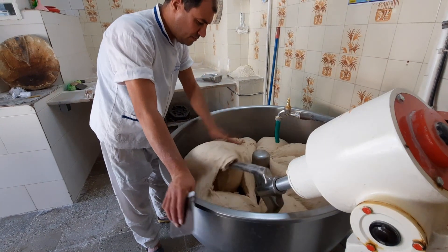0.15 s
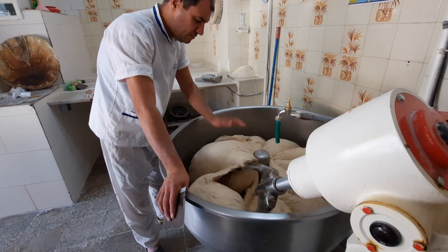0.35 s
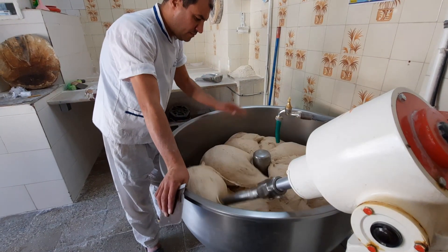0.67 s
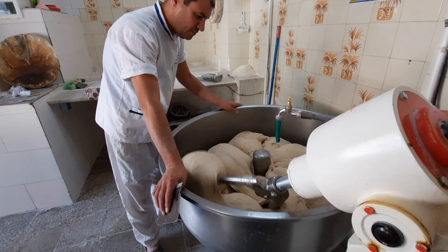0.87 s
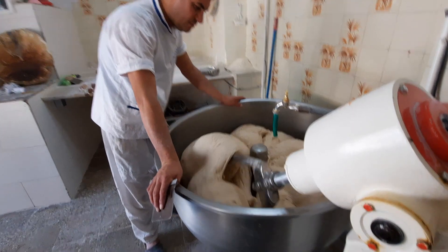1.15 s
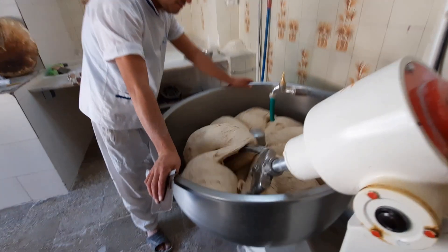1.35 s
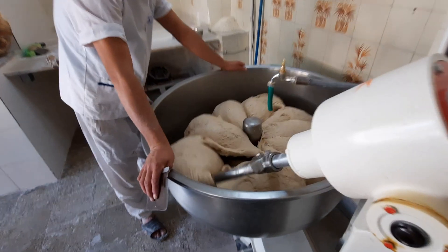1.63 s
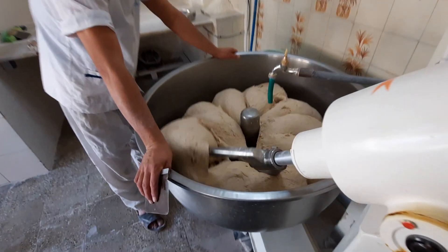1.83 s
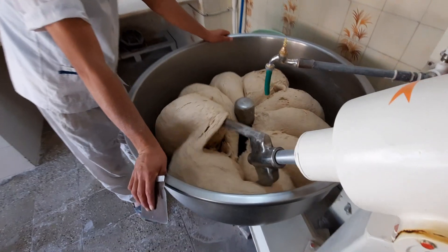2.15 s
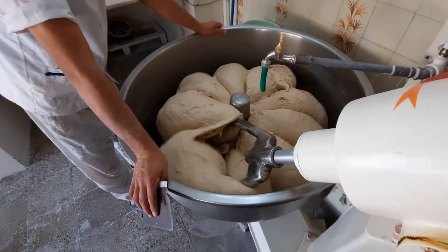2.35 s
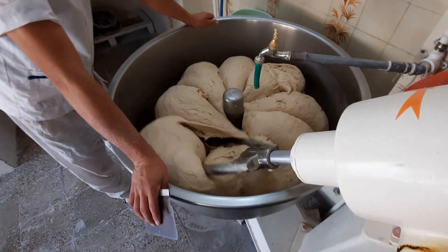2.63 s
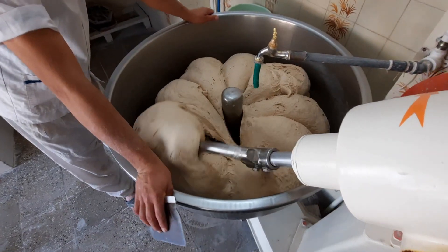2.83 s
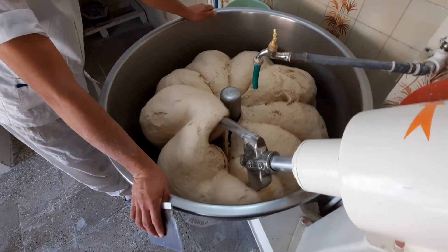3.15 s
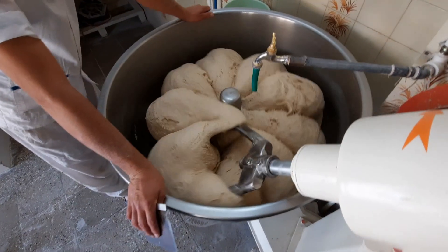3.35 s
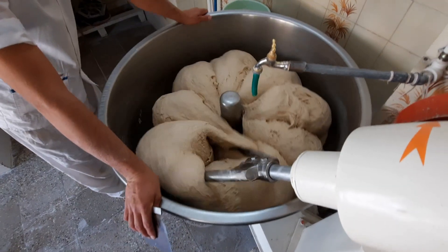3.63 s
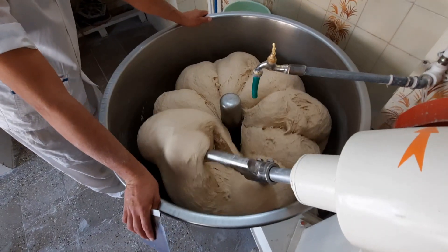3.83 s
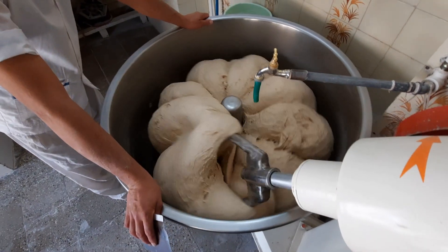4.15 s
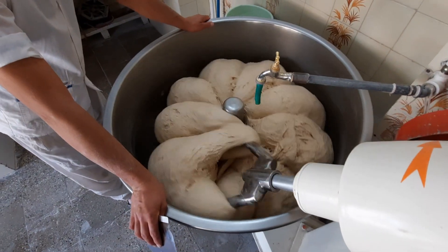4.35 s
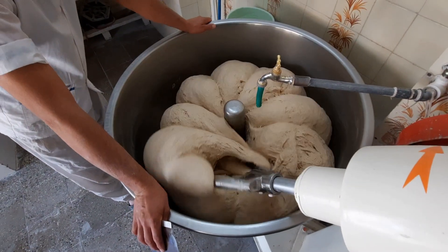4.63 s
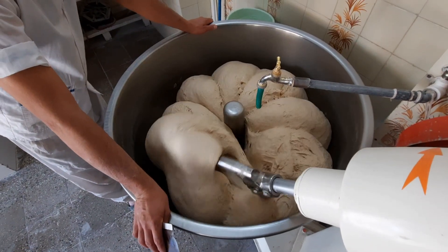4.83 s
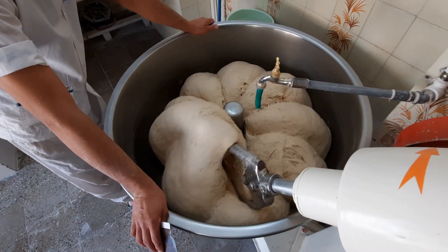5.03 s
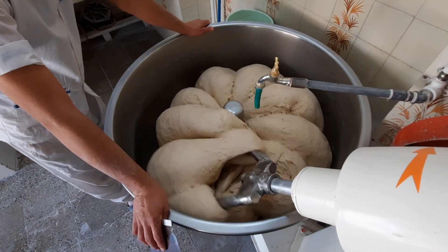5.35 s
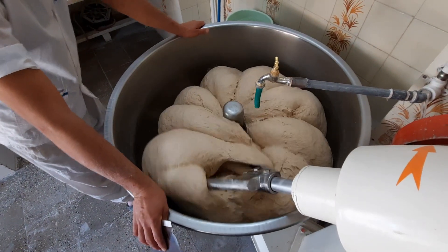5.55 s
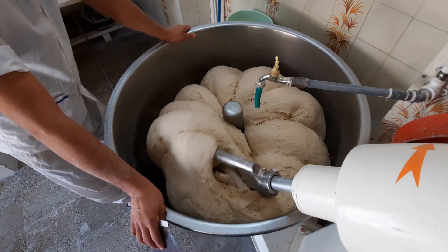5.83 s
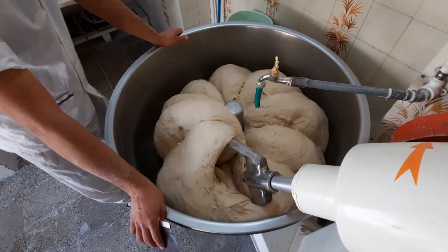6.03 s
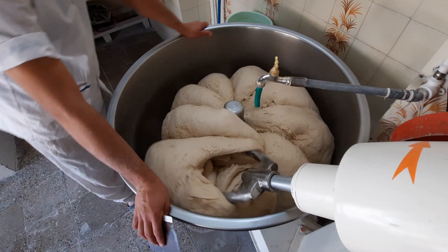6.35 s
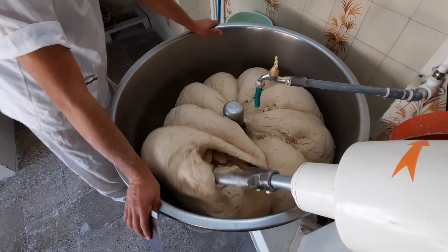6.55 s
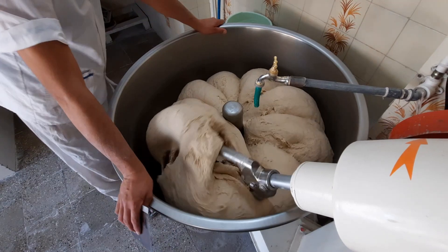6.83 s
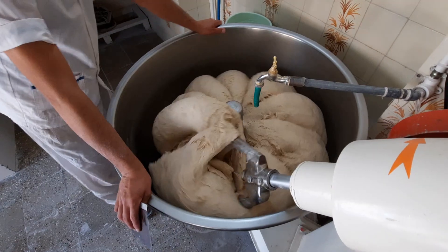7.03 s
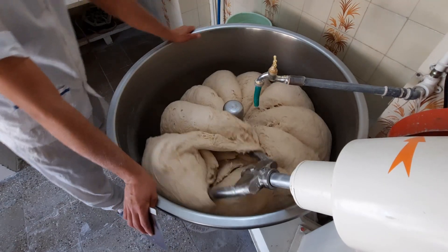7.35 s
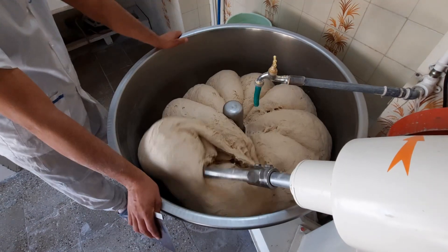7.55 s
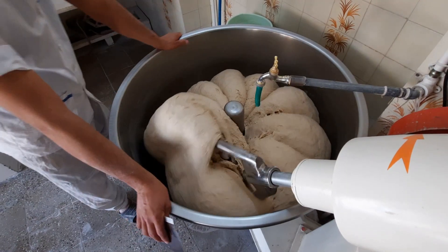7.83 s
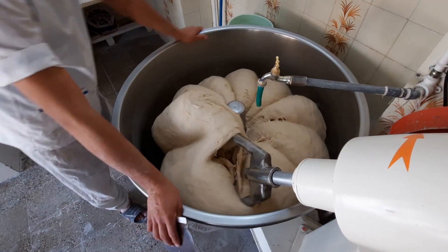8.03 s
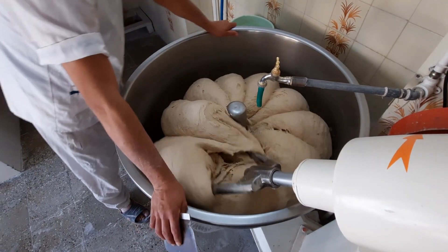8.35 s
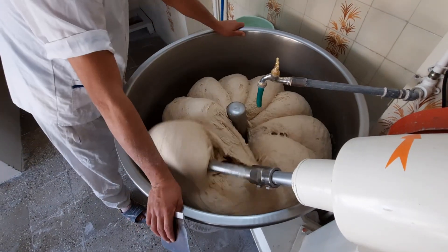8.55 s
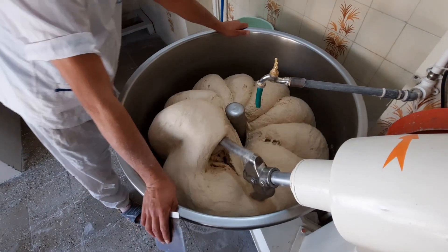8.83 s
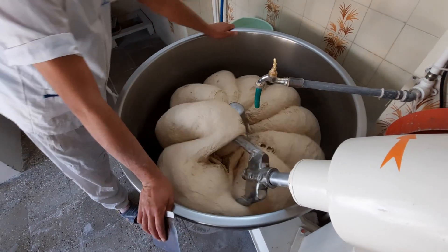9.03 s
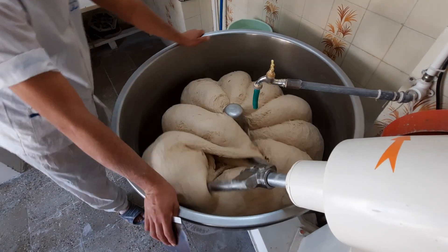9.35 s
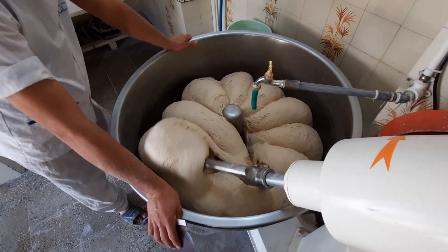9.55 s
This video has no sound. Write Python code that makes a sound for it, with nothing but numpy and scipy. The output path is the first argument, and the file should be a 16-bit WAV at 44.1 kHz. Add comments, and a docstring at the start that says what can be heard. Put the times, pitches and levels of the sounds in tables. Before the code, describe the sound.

A large dough mixer hums and whines steadily in a tiled bakery, with broad machine roar, dull handling bumps and a brief squeak.

```python
"""A motor hum and a whine sound throughout within a broad roar, with dull bumps and gusts on two microphones:
a large dough mixer kneads in a small tiled bakery. Hum, whine and gear notes are sines of wavering level and
phase; the squeal, squeak and bowl drone are noise-driven resonances, the squeal partly a wandering sine.
Roar, rumble, gusts, scuffs and the hiss of tearing dough are filtered noise; bumps are decaying oscillations."""
import sys
import numpy as np
from scipy import signal
from scipy.fft import rfft, irfft, next_fast_len
from scipy.io import wavfile

SR = 44100
rng = np.random.default_rng(int(sys.argv[2]) if len(sys.argv) > 2 else 0)


def output_pcm(signal):
    """Save a mono or channel-first signal as 16-bit PCM at the path in sys.argv[1].

    Samples are clipped to [-1, 1] before scaling.
    """
    pcm = np.clip(np.atleast_2d(signal).T, -1, 1) * 32767
    wavfile.write(sys.argv[1], SR, np.round(pcm).astype(np.int16))


N = 426888   # length in samples

# Machine roar in the room. Each row: time in seconds, level in dB, brightness in dB above about 1 kHz.
ROAR_LEVEL = [(0, -33.5, 1.5), (.7, -34.5, 0.5), (1.5, -36, 1.5), (2.3, -34.5, 0), (3.2, -34, 0.5),
              (4, -34.5, 2), (4.8, -33.5, 0.5), (5.6, -35, 1.5), (6.4, -35, 1.5), (7.2, -35.5, 1.5),
              (8, -36.5, 1), (8.8, -35.5, 1), (9.68, -35.5, 1.5)]
# Spectrum of the roar. Each row: frequency in Hz, density in dB per Hz.
ROAR_COLOUR = [(30, -19), (60, 7), (130, 2.5), (220, -6), (320, 2), (450, -1), (800, 0), (1000, -8),
               (1110, -4.5), (1350, -7.5), (1600, -11), (2600, -14.5), (3500, -23), (6500, -32),
               (8200, -66)]
# Power shared by the two sides. Each row: frequency in Hz, share from 0 to 1.
SHARED_POWER = [(60, 1), (300, 0.9), (700, 0.49), (1500, 0.37), (3000, 0.044), (7000, 0.072)]
# Phase lead of the left side over the right. Each row: frequency in Hz, lead in radians.
LEFT_LEAD = [(30, 0), (600, -.3), (950, -.8), (1550, -3.3), (1890, -2.3), (2670, -5.8), (7000, -8.2),
             (16000, -16)]

# Deep rumble through the floor. Each row: time in seconds, level in dB.
RUMBLE_LEVEL = [(0, -33), (.7, -40.5), (1.7, -35), (2.0, -48), (3.0, -45), (5.0, -48.5), (5.38, -65),
                (5.65, -35.5), (6.45, -48), (6.7, -41), (7.45, -31.5), (8.1, -47), (8.9, -36),
                (9.68, -35.5)]
# Spectrum of the rumble. Each row: frequency in Hz, density in dB per Hz.
RUMBLE_COLOUR = [(15, -31), (30, -35), (60, -7.5), (85, -12), (130, -12), (300, -66)]

# Gusts of air on the microphones. Each row: strongest moment in seconds, level in dB, length in seconds.
GUSTS = [(.08, -36, 0.82), (.88, -33, 0.29), (1.18, -38, 0.11), (1.78, -36, 0.25), (2.33, -37.5, 0.32),
         (2.66, -37.5, 0.28), (3.02, -35, 0.27), (5.64, -37.5, 0.18), (5.85, -39.5, 0.14),
         (6.58, -30, 0.071), (6.75, -37.5, 0.18), (7.1, -40, 0.35), (7.43, -34.5, 0.31),
         (7.6, -34.5, 0.048), (9.42, -32.5, 0.18), (9.6, -39, 0.14)]
# Spectrum of the gusts. Each row: frequency in Hz, density in dB per Hz.
GUST_COLOUR = [(20, -15), (50, -1.5), (140, 7.5), (220, 0.5), (330, 1.5), (500, -6), (900, -26),
               (3000, -77)]
CALM_DB = -50.5   # between the gusts
DRONE_GUST_DB, RUMBLE_GUST_DB = -19, -30   # share of each gust added to drone and rumble

# Dull bumps. Each row: start in seconds, level in dB, pitch in Hz, left-right difference in dB.
BUMPS = [(.015, -14.5, 121, 0), (0.039, -15.5, 130, 0), (.091, -18, 100, -3), (.098, -15.5, 316, 2),
         (.152, -23, 290, -4), (.162, -24, 210, -4), (.184, -17, 114, 7), (0.199, -19.5, 230, -2),
         (.208, -25, 370, 10), (0.743, -19.5, 100, -5), (.799, -20.5, 168, -4), (.873, -16, 155, -2),
         (0.889, -14, 114, 1), (.993, -12, 144, -4), (1.019, -22, 344, -6), (1.029, -20.5, 364, 11),
         (1.099, -18.5, 108, 7), (1.669, -19.5, 308, 0), (1.776, -22, 100, 0), (2.439, -25, 129, 4),
         (2.54, -20.5, 312, -4), (2.629, -21, 308, -6), (2.66, -22, 170, 2), (2.694, -16.5, 310, -4),
         (2.972, -20.5, 172, 7), (3.019, -18, 105, 7), (3.086, -21, 106, -2), (5.619, -20, 147, 6),
         (6.562, -21, 130, -2), (6.574, -14, 324, -4), (6.703, -16.5, 102, -1), (6.813, -21, 101, 6),
         (7.248, -15.5, 106, -4), (7.308, -14.5, 115.7, 6), (7.334, -23, 292, 0), (7.431, -12.5, 119, -1),
         (7.466, -17, 121, -1), (9.373, -14.5, 302, -1), (9.401, -17, 130.5, 2), (9.464, -18, 120, -1),
         (9.525, -15.5, 117, -4)]
BUMP_CYCLES, CYCLES_PER_OCTAVE = 1.63, 1.75   # at 120 Hz; higher bumps ring more cycles

# The steel bowl drones. Each row: time in seconds, level in dB.
DRONE_LEVEL = [(0, -34), (.6, -41.5), (2.1, -44.5), (2.55, -39.5), (4.2, -38), (4.95, -47), (6.3, -43),
               (7.0, -41), (9.68, -66)]
# Resonance of the bowl. Each row: frequency in Hz, width in Hz, level in dB.
BOWL_MODES = [(326.6, 19.5, 0)]

# Scuffs of dough or scraper on the bowl. Each row: start in seconds, level in dB, centre in Hz, length in seconds.
SCUFFS = [(0.203, -40, 3300, 0.026), (0.209, -45, 6000, 0.018), (0.55, -43, 4200, 0.02),
          (2.663, -47, 4300, 0.074), (2.766, -47, 5960, 0.081), (2.874, -45, 2670, 0.26),
          (3.954, -47, 3500, .12), (4.862, -50, 4300, 0.05), (5.82, -49, 4030, 0.13),
          (7.138, -42.5, 2280, 0.09), (7.14, -35, 760, 0.082), (7.146, -40, 1600, .1),
          (9.288, -46, 4000, .06)]

# Dough tearing off the arm. Each row: loudest moment in seconds, hiss level in dB, length in seconds.
TEARS = [(.212, -54, .03), (.47, -59, 0.074), (.9, -58, 0.17), (1.55, -63, 0.78), (2.35, -57, 0.54),
         (2.75, -55.5, 0.57), (3.5, -58, 0.95), (4.3, -55, 0.65), (5.25, -55.5, 1), (6.0, -56.5, 0.47),
         (6.4, -56.5, 0.21), (7.15, -56.5, 0.61), (8.0, -64, 0.98), (9.1, -54.5, 0.85)]
# Spectrum of the hiss. Each row: frequency in Hz, density in dB per Hz.
HISS_COLOUR = [(1500, -14), (3000, 10), (6000, 12), (8000, 14), (9200, -3), (11000, 9.5), (15000, 9.5),
               (15700, 6)]
SLIDING_DB = -64   # between the tears

# A rising chirp. Each row: start in seconds, level in dB, first pitch in Hz, last pitch in Hz, length in seconds.
CHIRPS = [(7.168, -46.5, 2280, 2460, 0.07)]
CHIRP_LEAD = -.08   # cycles, left ahead

# A squeak in quick catches. Each row: time in seconds, level in dB, upper resonance in dB against the lower.
SQUEAK_CATCHES = [(2.887, -46, 0), (2.91, -53, -4), (2.935, -39, -5), (2.977, -42, -12), (3.003, -39, -14),
                  (3.04, -48, -5), (3.07, -51, -2), (3.12, -54, -4), (3.16, -51, -7), (3.2, -54, -6)]
# Resonances of the squeak. Each row: frequency in Hz, width in Hz, level in dB.
SQUEAK_MODES = [(3065, 75, 0), (3390, 75, 0)]
CATCH_S = 0.037

# Bearing squeal. Each row: time in seconds, level in dB, left-right difference in dB, left lead in cycles.
SQUEAL = [(0, -37, -3.5, 0.13), (1.2, -41, -1.5, -0.16), (1.7, -42, -0.5, -0.21), (2.6, -41.5, -3, -0.27),
          (2.8, -37, -1, -0.25), (3.4, -38, -8, -0.47), (4.05, -40, -1, -0.28), (4.35, -39, -5, -0.22),
          (4.85, -41, 1, -0.28), (5.2, -38.5, -0.5, -0.22), (5.9, -40.5, -6, -0.35),
          (7.3, -36.5, -2, -0.49), (8.2, -40.5, 2.5, -0.34), (8.5, -38, -2, -0.22),
          (9.2, -38.5, 0.5, -0.33), (9.68, -39.5, 0, -0.19)]
# Resonances of the bearing. Each row: frequency in Hz, width in Hz, level in dB.
BEARING_MODES = [(7038, 85, -12), (7316, 55, -4), (7597, 40, -19), (11219, 35, -29), (14330, 70, -36),
                 (14621, 45, -34), (4371, 40, -31), (4578, 30, -25), (4813, 20, -34)]
SING_HZ, SING_DB, SING_WANDER_HZ = 7312, -2.5, 12   # sung part of the squeal; spread of its pitch
# Faint rough whistle of the bearing. Each row: middle in seconds, level in dB, length in seconds.
WHISTLE = [(.2, -59, .6), (1.2, -61, .9)]
# Resonance of the whistle: frequency in Hz, width in Hz, level in dB.
WHISTLE_MODE = (4371, 25, 0)

# Lasting gear tones. Each row: frequency in Hz, level in dB.
GEARS = [(738.5, -46.5), (863, -52), (938, -52.5), (963, -53)]
# A gear tone stands out for a while. Each row: frequency in Hz, middle in seconds, level in dB, length in seconds.
GEAR_SWELLS = [(738.5, 0.49, -46, 0.8), (740, 2.04, -44, 1.2), (864, 2.3, -44, 0.8), (863, 3.6, -47, 0.69),
               (710, .4, -49, 0.96), (712, 1.7, -48, 1.6), (938, 2.66, -46, 0.35), (599, 0.31, -45, .5),
               (599, 2.0, -45, 0.84), (800, 1.3, -48, 0.68)]
# A rough low tone that comes and goes. Each row: time in seconds, pitch in Hz, level in dB.
GROAN = [(0, 564, -62), (2.05, 554, -58), (2.3, 556.5, -42), (2.9, 557, -44.5), (3.5, 550, -46),
         (4.0, 536, -67), (4.8, 533, -42), (5.4, 534, -51), (6.0, 538, -56), (7.2, 531, -51),
         (8.0, 535, -55), (9.68, 551, -57)]
MESH_HZ = 738.5   # gear mesh; it also shifts the whine up into a second pair

# Mains hum of the motor. Each row: time in seconds, level in dB, left-right difference in dB.
HUM = [(0, -38, -14), (.5, -30, -2), (1.2, -35, -8), (2.0, -42, -12), (2.4, -31.5, 0), (2.75, -47, -20),
       (3.03, -27, 1), (3.4, -38, -4), (3.8, -30.5, 2), (4.3, -32.5, 0.5), (4.75, -26, -0.5),
       (5.4, -27.5, 0), (6.5, -26.5, 0.5), (7.0, -30, -5), (7.3, -25.5, 3.5), (8.05, -32, -0.5),
       (8.7, -26, 1), (9.35, -29, 0), (9.68, -27, 1)]
HUM_HZ = 99.95
# Overtones of the hum. Each row: multiple of the hum frequency, level in dB.
HUM_OVERTONES = [(3, -44.5), (6, -49.5), (8, -52)]
# The hum dips briefly, most on the left. Each row: time in seconds, depth in dB.
HUM_DIPS = [(.15, 14), (.74, 17), (.97, 15), (1.96, 14), (2.239, 20), (2.8, 21), (3.15, 25), (3.4, 23),
            (5.58, 17), (5.8, 12), (6.675, 4), (6.87, 14), (7.345, 16), (9.385, 3), (7.98, 8), (8.76, 16)]
DIP_S, RIGHT_DIP_SHARE = 0.047, 0.074   # half width of a dip; part of its dB depth on the right

# Pitch of the whine at mean load. Each row: time in seconds, frequency in Hz.
ROTOR = [(0, 1917), (.9, 1921), (2.6, 1920), (4.2, 1917), (6, 1914), (9.68, 1913)]
TURN_S, HARDEST_S = .975, .13   # one turn of the kneading arm; first moment of hardest pull
SAG_HZ = 3.2   # the pull of the dough slows the rotor each turn; swing either way

# Rotor whine, swelling as the microphones move among the wall reflections. Each row: time in seconds,
# level in dB, left-right difference in dB, left lead in cycles.
WHINE = [(0, -46, -4, -0.25), (.14, -35.5, -2, -0.3), (.33, -37.5, -2, -0.28), (.47, -42, -4, -0.41),
         (.75, -39.5, -1, -0.59), (1.0, -40.5, 0, -0.64), (1.36, -47, 2, -0.53), (1.5, -41, 0, -0.82),
         (1.62, -36, 0, -0.62), (1.8, -38, -1, -0.65), (1.88, -41, -1, -.62), (1.98, -49, 0, -0.49),
         (2.14, -39, -3, -0.26), (2.24, -42, -10, -0.68), (2.39, -33, 2, -0.84), (2.53, -42, 4, -0.71),
         (2.69, -37.5, -1, -.61), (2.82, -33, 3.5, -0.57), (3.1, -36, 4, -0.36), (3.49, -41.5, -3, -0.19),
         (3.68, -40, -1, -.02), (3.78, -43.5, 0, -0.37), (4.02, -37, -2, -0.26), (4.24, -42, -6.5, -0.57),
         (4.61, -40, 3, -0.68), (4.84, -42, -1, -.32), (5.25, -40.5, -2, -0.34), (5.49, -43, -3, -.46),
         (5.63, -39, -1, -0.29), (5.8, -48.5, 1, -0.3), (6.08, -35.5, 0, -0.26), (6.25, -39, -1, -0.26),
         (6.35, -46, -5, -0.25), (6.5, -39, -3, -0.32), (7.0, -38, 3, -0.22), (7.145, -40.5, 3, -0.21),
         (7.18, -44, 6, -0.39), (7.32, -43, 0, -0.36), (7.45, -38.5, 1, -.34), (8.23, -42.5, 2, -0.31),
         (8.275, -36.5, 2, -0.28), (8.66, -35, 3, -0.28), (8.76, -45.5, 5, -0.31), (9.04, -40, 4, -0.08),
         (9.2, -44, 2, -0.17), (9.37, -37.5, 2, -0.34), (9.68, -37.5, 4, -0.25)]
# Sideband one hum step below. Each row: time in seconds, level in dB, left-right difference in dB, left lead in cycles.
LOWER_SIDEBAND = [(0, -46, 2, -0.17), (.4, -46, -3, -0.28), (.75, -48, 3, -0.32), (1.3, -50, 0, 0.33),
                  (1.8, -40.5, 6, -0.29), (2.25, -47, -2, -0.25), (2.35, -47, 1, -0.5), (2.9, -49, -2, -.5),
                  (3.0, -48, -3, -0.17), (3.68, -44.5, -1, -.2), (3.76, -50, 0, -0.5), (4.15, -49, 0, -.6),
                  (4.5, -46, -6, 0.2), (5.0, -52, -7, -0.4), (5.3, -51, 0, -.35), (5.42, -45, 1, -0.19),
                  (5.68, -45.5, 1, -0.17), (5.85, -62, 3, -0.15), (6.45, -46.5, 3, -0.3),
                  (7.05, -48, -2, -0.22), (7.25, -49, 2, -0.32), (8.6, -50, -3, -0.58),
                  (9.68, -53, -4, -0.12)]
# Sideband one hum step above, at times. Each row: middle in seconds, level in dB, length in seconds.
UPPER_SIDEBAND = [(2.4, -54, .5), (3.35, -49, .6), (4.4, -54, .5), (5.0, -54, .4), (8.7, -60, 0.57)]
UPPER_CALM_DB = -60
# Upper pair. Each row: time in seconds, level of its high tone in dB, of its low tone in dB, left lead in cycles.
UPPER_PAIR = [(0, -59, -48, -0.21), (1.1, -60, -55, -0.57), (1.55, -54, -67, -0.17),
              (1.95, -59, -47.5, 0.063), (2.3, -75, -57.5, 0.06), (3.0, -55, -51.5, 0.13),
              (3.35, -61, -54.5, 0.04), (4.3, -51, -55, 0.23), (5.1, -46.5, -50.5, 0.18),
              (5.6, -50.5, -57, 0.2), (6.1, -51, -70, 0.18), (6.5, -54, -46.5, 0.12), (6.7, -56, -61, 0.21),
              (7.1, -57.5, -57, 0.053), (8.3, -55, -59, 0.31), (9.0, -58, -49, 0.17),
              (9.68, -53, -58, 0.33)]
PAIR_PAN_DB = -5
PAIR_ROUGH = 2.1   # the upper pair wavers this many times more

CUTOFF_HZ = 15740


def amp(db):
    """Level law: amplitude grows tenfold every 20 dB."""
    return np.exp(np.asarray(db) * (np.log(10) / 20))


def rms_one(x):
    """Normalisation to unit mean power."""
    return x / np.sqrt(np.mean(x ** 2) + 1e-20)


def in_time(rows):
    """Linear interpolation in time: each column of a curve, one value a sample."""
    s, *columns = np.transpose(rows)
    return [np.interp(np.arange(N) / SR, s, c) for c in columns]


def at_hz(points, hz):
    """Interpolation along logarithmic frequency."""
    points = np.array(points)
    return np.interp(np.log(hz), np.log(points[:, 0]), points[:, 1])


def drift(rate):
    """Slow random variation of spread 1: coarse noise through a double one-pole low-pass."""
    r = np.exp(-80 * np.pi * rate / SR)   # one coarse step is 40 samples
    coarse = rng.standard_normal(N // 40 + 2002)
    slow = signal.lfilter([1], [1, -2 * r, r * r], coarse)[2000:]
    return np.interp(np.arange(N) / 40, np.arange(len(slow)), rms_one(slow))


def swells(rows):
    """Addition of power: separate bells (middle s, dB, length s) combine into one gain."""
    t = np.arange(0, N + 40, 40) / SR
    power = sum(amp(2 * db) * np.exp(-8 * ((t - s) / length) ** 2) for s, db, length in rows)
    return np.interp(np.arange(N) / SR, t, np.sqrt(power))


def panned(level_db, pan_db):
    """Stereo level difference: half of it raises the left, half lowers the right."""
    return amp(level_db + np.array([[.5], [-.5]]) * pan_db)


def stereo_noise(colour, likeness, band_hz, patchy_db=0, bright_db=0):
    """Partial coherence: coloured noise partly shared by the sides, scaled to rms 1 within the band.

    With patchy_db each half octave swells on its own.
    """
    size = next_fast_len(N)
    hz = np.maximum(np.arange(size // 2 + 1) * SR / size, 1)
    shared, left, right = rfft(rng.standard_normal((3, size)))
    alike = np.clip(at_hz(likeness, hz), 0, 1)
    lead = np.exp(1j * at_hz(LEFT_LEAD, hz))
    common = shared * np.array([lead, np.ones_like(lead)])
    pair = np.sqrt(alike) * common + np.sqrt(1 - alike) * np.array([left, right])
    gain = amp(at_hz(colour, hz))
    in_band = (hz > band_hz[0]) & (hz < band_hz[1])
    gain /= np.sqrt(np.sum(gain[in_band] ** 2) / len(hz))
    coloured = pair * gain
    if not patchy_db:
        return irfft(coloured, size)[:, :N]
    half_octave = np.clip(2 * np.log2(hz / 60), 0, 12)
    out = np.zeros((2, N))
    for k in range(13):
        overlap = np.clip(1 - abs(half_octave - k), 0, 1)
        band = irfft(coloured * overlap, size)[:, :N]
        out += amp(patchy_db * drift(18.0) + bright_db * (k > 8)) * band
    return out


def tone(hz, waver_db, rate, wander, lead=None):
    """Interference of room reflections: a sine, of rms 1 before its level and phase waver at each side."""
    phase = 2 * np.pi * np.cumsum(np.broadcast_to(hz, N)) / SR + rng.uniform(0, 2 * np.pi)
    both_db = waver_db * drift(rate)
    left_ahead = at_hz(LEFT_LEAD, hz) if lead is None else 2 * np.pi * lead
    sides = []
    for ahead in (left_ahead, 0):
        level = amp(both_db + 0.084 * waver_db * drift(rate))
        sides.append(level * np.sin(phase + wander * drift(rate) + ahead))
    return np.sqrt(2) * np.array(sides)


def resonances(modes, alike, lead=None):
    """Forced resonance: noise passes twice through each narrow mode; the left lead (cycles) drifts slowly."""
    out = 0
    share = np.clip(alike, 0, 1)
    for hz, width, level_db in modes:
        r, w = np.exp(-np.pi * width / SR), 2 * np.pi * hz / SR
        sos = [[0.98, 0, -1.117, 1, -2 * r * np.cos(w), r * r]] * 2
        shared, left, right = rms_one(signal.sosfilt(sos, rng.standard_normal((3, N))))
        ahead = at_hz(LEFT_LEAD, hz) if lead is None else 2 * np.pi * lead
        ahead = ahead + 0.25 * drift(0.43)
        # The slope of a narrow band gives its quarter-cycle advance.
        early = shared * np.cos(ahead) + np.gradient(shared) / np.sin(w) * np.sin(ahead)
        common = np.sqrt(share) * np.array([early, shared])
        separate = np.sqrt(1 - share) * np.array([left, right])
        out = out + amp(level_db) * (common + separate)
    return out


def roar():
    """Diffuse field: broadband noise whose half octaves fluctuate independently."""
    roar_db, bright_db = in_time(ROAR_LEVEL)
    return amp(roar_db) * stereo_noise(ROAR_COLOUR, SHARED_POWER, (400, 1500), patchy_db=2.0, bright_db=bright_db)


def rumble(gusts):
    """Structure-borne vibration: deep noise through the floor, its power raised slightly by gusts."""
    level = np.hypot(amp(in_time(RUMBLE_LEVEL)[0]), amp(RUMBLE_GUST_DB) * gusts)
    shaking = level * amp(1.5 * drift(8.2))
    return shaking * stereo_noise(RUMBLE_COLOUR, [(30, 0.24), (90, 0.66)], band_hz=(30, 82))


def buffet(gusts):
    """Turbulent pressure: low noise in gusts that fluctuate separately at each microphone."""
    lumps = np.hypot(amp(CALM_DB), gusts) * amp(4.7 * np.array([drift(7.4), drift(21.0)]))
    return lumps * stereo_noise(GUST_COLOUR, [(30, .3), (400, .25)], band_hz=(120, 260))


def bumps():
    """Damped oscillation: a few cycles swell quickly and fall more slowly, with a short hard knock on top."""
    out = np.zeros((2, N))
    for s, level_db, hz, pan_db in BUMPS:
        octaves = np.log2(hz / 120)
        cycles = BUMP_CYCLES + CYCLES_PER_OCTAVE * octaves
        t = np.arange(round(4 * cycles / hz * SR)) / SR
        rise = 3.07 * t * hz / cycles
        skew = rng.normal(0, .7) * np.array([[.5], [-.5]])   # radians between the sides
        body = (rise * np.exp(1 - rise)) ** 1.34 * np.sin(2 * np.pi * hz * t + skew)
        knock_envelope = 2 * rise * np.exp(1 - 2 * rise)
        knock = amp(-5.5 - 5.0 * octaves) * knock_envelope * np.sin(2 * np.pi * 1.85 * hz * t + skew)
        at = round(s * SR)
        out[:, at:at + len(t)] += panned(level_db, pan_db) * (body + knock)
    return out


def drone(gusts):
    """Forced resonance of the steel bowl, its drive raised by gusts."""
    level = np.hypot(amp(in_time(DRONE_LEVEL)[0]), amp(DRONE_GUST_DB) * gusts)
    return level * resonances(BOWL_MODES, alike=0.35)


def scuffs():
    """Sliding friction: bursts of noise about an octave wide, with a soft start."""
    out = np.zeros((2, N))
    for s, level_db, hz, length in SCUFFS:
        rise = np.arange(round(3 * length * SR)) / SR / (0.35 * length)
        band = signal.butter(2, [hz / 1.3, hz * 1.3], "band", fs=SR, output="sos")
        noise = rng.standard_normal((2, round(.8 * SR)))
        burst = rms_one(signal.sosfilt(band, noise))[:, :len(rise)]
        at = round(s * SR)
        out[:, at:at + len(rise)] += amp(level_db) * rise * np.exp(1 - rise) * burst
    return out


def dough():
    """Noise of rupture: hiss swells as dough tears from the arm, over a faint sliding hiss."""
    tearing = np.hypot(amp(SLIDING_DB), swells(TEARS)) * amp(1.94 * drift(16.0))
    return tearing * stereo_noise(HISS_COLOUR, SHARED_POWER, band_hz=(9500, 15500))


def chirps():
    """Frequency glide: a slipping contact sings briefly upwards."""
    t = np.arange(N) / SR
    out = np.zeros((2, N))
    for s, level_db, from_hz, to_hz, length in CHIRPS:
        hz = np.interp(t, [s, s + length], [from_hz, to_hz])
        sung = tone(hz, waver_db=4.5, rate=90., wander=.6, lead=CHIRP_LEAD)
        out += swells([(s + length / 2, level_db, length)]) * sung
    return out


def squeak():
    """Stick-slip friction: rubbing that catches again and again excites two resonances unevenly."""
    low, high = SQUEAK_MODES
    low_gain = swells([(s, db, CATCH_S) for s, db, _ in SQUEAK_CATCHES])
    high_gain = swells([(s, db + upper_db, CATCH_S) for s, db, upper_db in SQUEAK_CATCHES])
    return low_gain * resonances([low], alike=0.46) + high_gain * resonances([high], alike=0.3)


def bearing():
    """Friction-driven resonance: a squeal, mostly louder on the right, part noise and part wandering sine."""
    level_db, pan_db, lead = in_time(SQUEAL)
    sing_hz = SING_HZ + SING_WANDER_HZ * drift(12)
    sung = amp(SING_DB) * tone(sing_hz, waver_db=1.5, rate=20., wander=.4, lead=lead)
    rubbed = resonances(BEARING_MODES, alike=0.62, lead=lead)
    squeal = panned(level_db + 1.0 * drift(8.0), pan_db) * (sung + rubbed)
    whistle = swells(WHISTLE) * resonances([WHISTLE_MODE], alike=0.64, lead=0)
    return squeal + whistle


def rotor_hz():
    """Speed under load: the whine's pitch changes slowly and sags on every turn of the arm."""
    turns = (np.arange(N) / SR - HARDEST_S) / TURN_S
    return in_time(ROTOR)[0] - SAG_HZ * np.cos(2 * np.pi * turns)


def gears():
    """Mesh frequencies: gear tones follow the rotor and some swell; a rough groan has its own pitch."""
    whine_hz = rotor_hz()
    speed = whine_hz / whine_hz.mean()
    out = np.zeros((2, N))
    for hz, level_db in GEARS:
        out += amp(level_db) * tone(hz * speed, waver_db=2.0, rate=2.5, wander=0.45)
    for hz, *swell in GEAR_SWELLS:
        out += swells([swell]) * tone(hz * speed, waver_db=2.0, rate=9.9, wander=0.35)
    hz, level_db = in_time(GROAN)
    groan = tone(hz + 3.94 * drift(4.91), waver_db=3.0, rate=10.0, wander=.5)
    return out + amp(level_db) * groan


def hum():
    """Magnetic force at twice the mains frequency: a steady pitch with overtones; the fundamental dips."""
    t = np.arange(N) / SR
    out = panned(*in_time(HUM)) * tone(HUM_HZ, waver_db=1.46, rate=7.4, wander=0.1)
    dip_db = sum(db * np.exp(-((t - s) / DIP_S) ** 2) for s, db in HUM_DIPS)
    out *= amp(-np.array([[1], [RIGHT_DIP_SHARE]]) * dip_db)
    for multiple, level_db in HUM_OVERTONES:
        out += amp(level_db) * tone(multiple * HUM_HZ, waver_db=4.0, rate=5.6, wander=0.24)
    return out


def whine():
    """Modulation sidebands: the rotor tone, partners one hum step away and a pair raised by the gear mesh."""
    hz = rotor_hz()
    whine_db, pan_db, lead = in_time(WHINE)
    upper_db = 20 * np.log10(np.hypot(amp(UPPER_CALM_DB), swells(UPPER_SIDEBAND)))
    high_db, low_db, pair_lead = in_time(UPPER_PAIR)
    # Each row: shift in Hz, level in dB, left-right difference in dB, left lead in cycles.
    partials = [(0, whine_db, pan_db, lead),
                (-HUM_HZ, *in_time(LOWER_SIDEBAND)),
                (HUM_HZ, upper_db, pan_db, lead),
                (MESH_HZ, high_db, PAIR_PAN_DB, pair_lead),
                (MESH_HZ - HUM_HZ, low_db, PAIR_PAN_DB, pair_lead)]
    out = np.zeros((2, N))
    for shift_hz, level_db, side_db, ahead in partials:
        rough = PAIR_ROUGH if shift_hz > HUM_HZ else 1
        partial = tone(hz + shift_hz, waver_db=1.4 * rough, rate=30., wander=.18 * rough, lead=ahead)
        out += panned(level_db, side_db) * partial
    return out


def scene():
    """Superposition: room and microphone disturbances, bowl and dough, and the machine are added."""
    gusts = swells(GUSTS)
    background = roar() + rumble(gusts) + buffet(gusts) + bumps()
    bowl_and_dough = drone(gusts) + scuffs() + dough()
    machine = chirps() + squeak() + bearing() + gears() + hum() + whine()
    return background + bowl_and_dough + machine


def record(dry):
    """Band limitation: a steep elliptic low-pass removes the top."""
    return signal.sosfilt(signal.ellip(12, .3, 60, CUTOFF_HZ, fs=SR, output="sos"), dry)


dry = scene()
out = record(dry)
output_pcm(out)
```